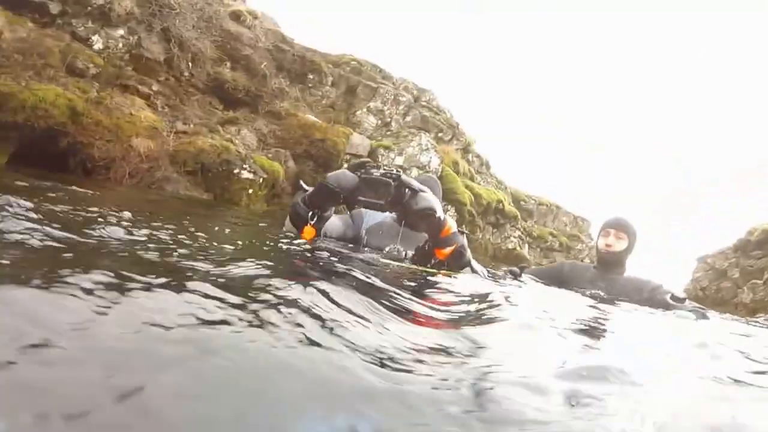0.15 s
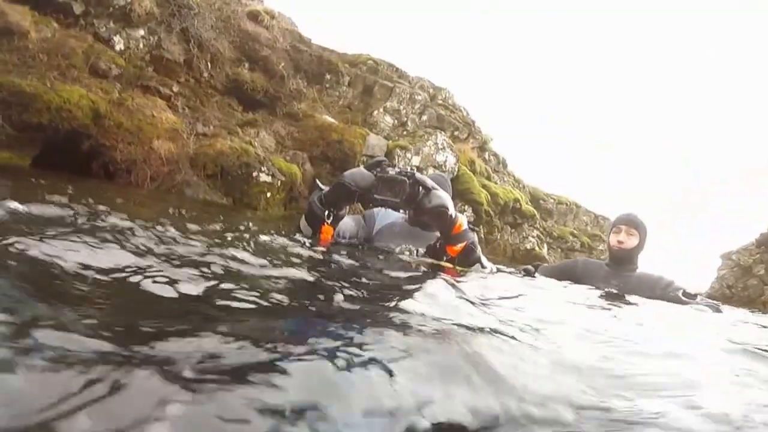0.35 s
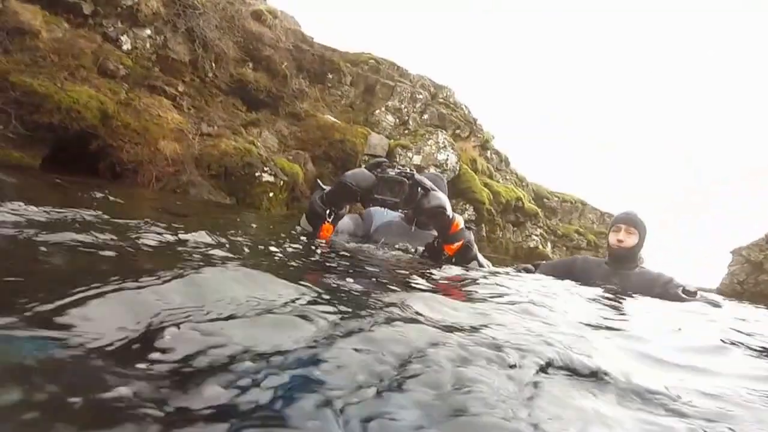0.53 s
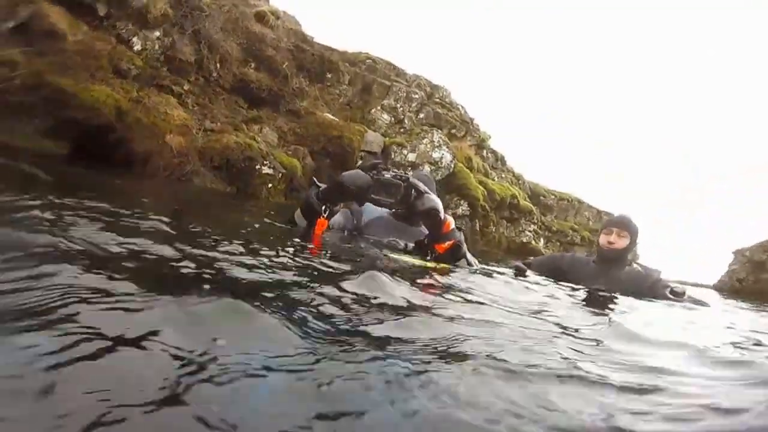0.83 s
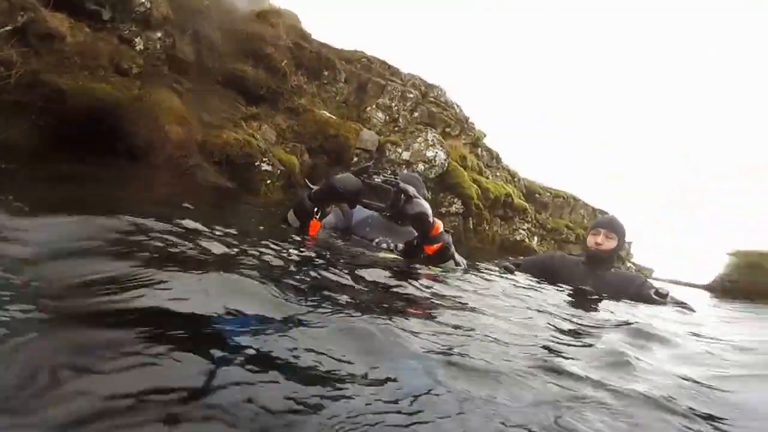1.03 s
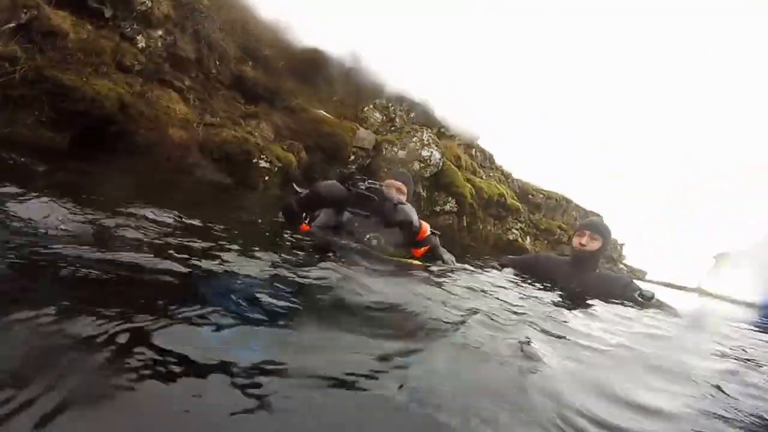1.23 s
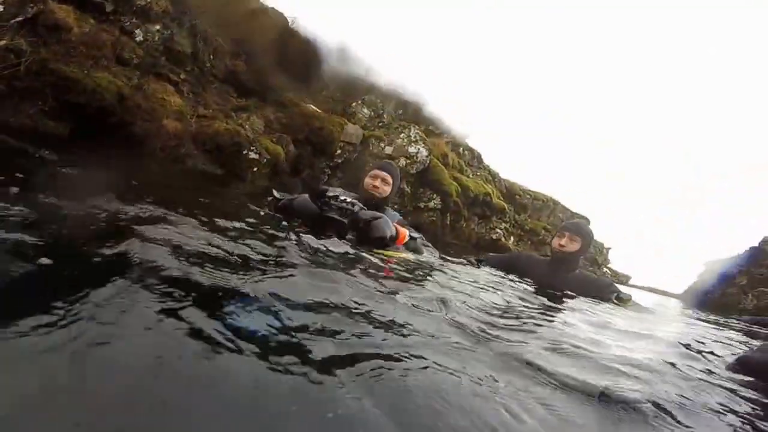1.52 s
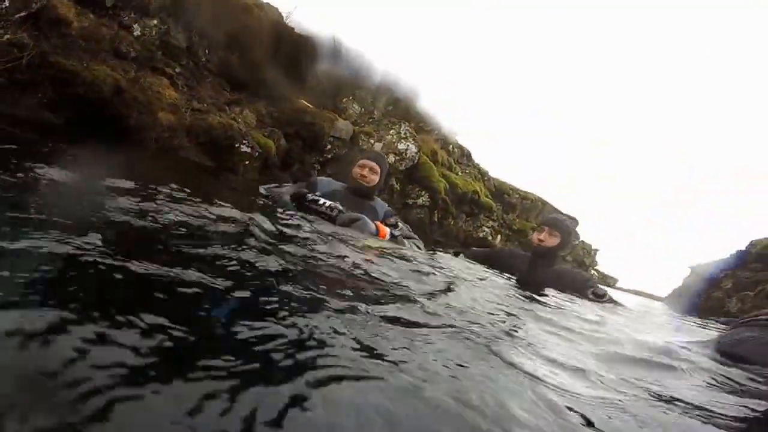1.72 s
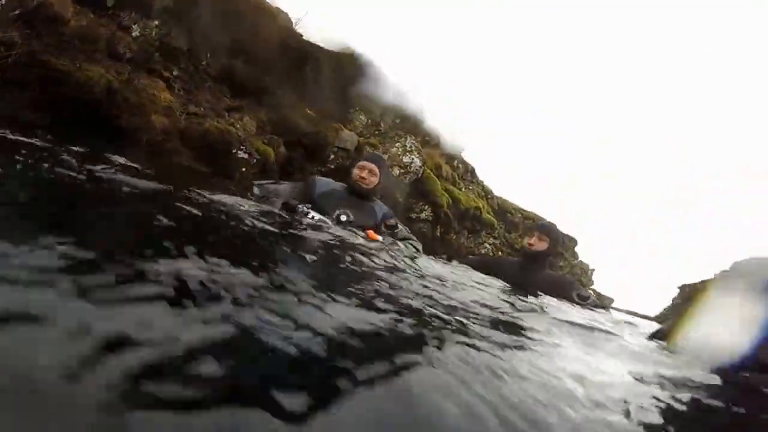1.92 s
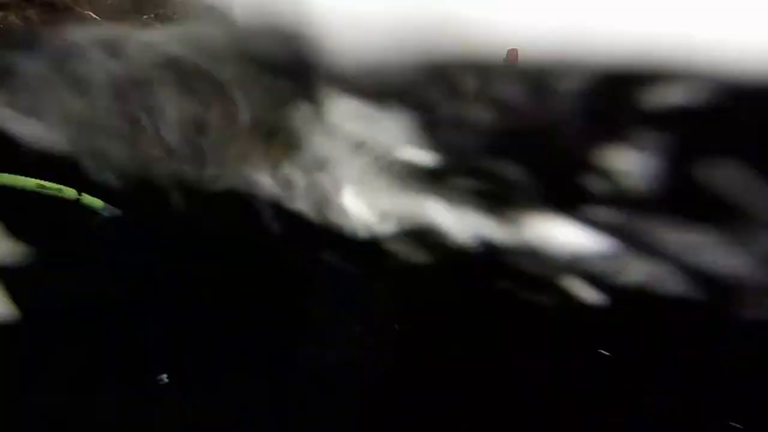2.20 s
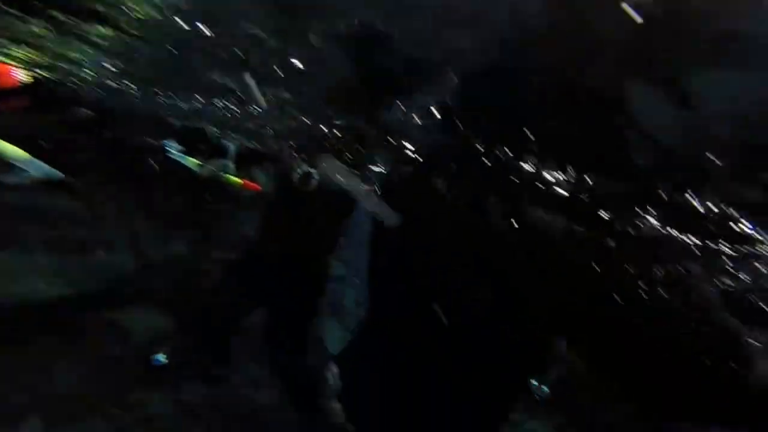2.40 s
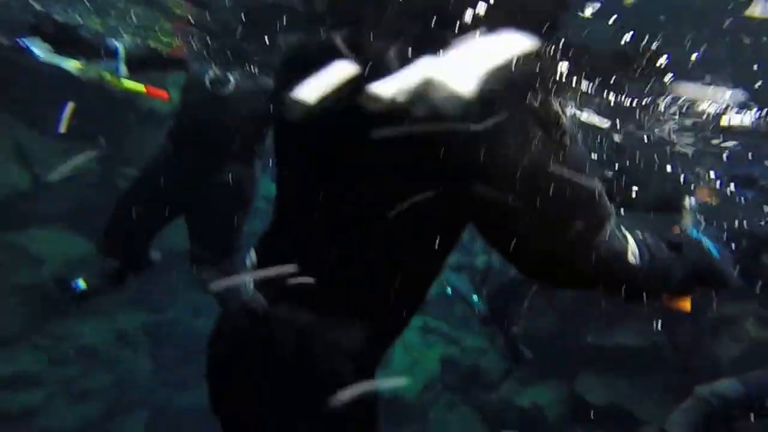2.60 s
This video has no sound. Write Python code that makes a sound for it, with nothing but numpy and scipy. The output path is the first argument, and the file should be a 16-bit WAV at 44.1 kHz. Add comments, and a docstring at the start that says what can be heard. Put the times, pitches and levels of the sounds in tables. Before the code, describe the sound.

Bubbling plunge underwater: faint muffled wash and drips, then a sudden loud burst of gurgling bubbles

```python
"""Air pockets break off and ring as bubbles while a waterproof case sinks by a rocky shore.
Each bubble is a decaying sine with a sliding, wavering pitch; random swarms of them fill in around it.
Water knocks ring the case modes; snaps and splashes are filtered noise bursts.
Before the plunge, wash and splashes come coloured by the case, drops plip beside it, wavelets bump it.
Low noise is the push of moving water; the wash surges as the case goes under, then dies away."""
import sys
import numpy as np
from scipy import signal
from scipy.fft import rfft, irfft
from scipy.io import wavfile
from scipy.ndimage import uniform_filter1d

SR = 44100
rng = np.random.default_rng(int(sys.argv[2]) if len(sys.argv) > 2 else 0)


def store_pcm(level_fs):
    """Save levels as 16-bit WAV."""
    pcm = np.round(np.clip(level_fs, -1, 1) * 32767).astype(np.int16)
    wavfile.write(sys.argv[1], SR, np.atleast_2d(pcm).T)


N = 121275
TIME_S, RING_S = np.arange(N) / SR, np.arange(8192) / SR
BURST_SAMPLES = 1024

# Air pockets ringing. Each row: start in seconds, initial pitch in Hz, peak in dB, rise in seconds,
# decay time in seconds, pitch glide as a share.
BUBBLE_EVENTS = [(2.1257, 3440, -20.5, 0.00046, 0.0042, 0.029), (2.1508, 4170, -8, 0.00025, 0.0016, 0.016),
                 (2.1667, 2555, -1.5, 0.0015, 0.0042, -0.18), (2.1860, 1390, -11.5, 0.00094, 0.0021, 0.087),
                 (2.1895, 2220, -19, 0.0017, 0.0028, 0.044), (2.2055, 2470, -14.5, 0.00078, 0.0045, 0.13),
                 (2.2105, 3830, -14, 0.00058, 0.0036, -0.026),
                 (2.2160, 3090, -1.5, 0.00073, 0.00064, -0.23), (2.2058, 1774, -19.5, 0.00064, 0.017, 0.1),
                 (2.2178, 2050, -13, 0.00076, 0.0085, 0.069), (2.2331, 2900, -6, 0.00057, 0.00091, .15),
                 (2.2457, 2370, -13, 0.0012, 0.0029, -0.0068), (2.2465, 1715, -20, 0.0011, 0.0049, 0.14),
                 (2.2678, 1342, -5.5, 0.0054, 0.0016, 0.045), (2.2700, 1955, -15.5, 0.0026, 0.0046, 0.01),
                 (2.2735, 1538, -14.5, .001, .005, 0), (2.2862, 868, -28, 0.0012, 0.027, -.03),
                 (2.2855, 566, -39, .001, 0.026, 0), (2.3070, 1260, -35, 0.0015, 0.012, 0.02),
                 (2.3395, 3010, -15, 0.00059, 0.00085, -0.07), (2.3605, 2880, -28, 0.001, 0.0065, 0.008),
                 (2.3610, 1430, -35, 0.0017, 0.0054, 0.023), (2.3730, 845, -23.5, 0.0019, 0.0077, -0.017),
                 (2.376, 890, -34, .003, 0.02, 0.065), (2.3835, 1940, -20.5, 0.0001, 0.0056, -0.019),
                 (2.3960, 1235, -33.5, 0.0021, 0.012, 0.055), (2.4503, 2260, -6, .0003, 0.0007, -0.14),
                 (2.452, 1440, -19, 0.0028, 0.0068, -0.039), (2.4630, 1325, -15.5, 0.0012, 0.0045, 0.00088),
                 (2.4690, 650, -29, 0.0017, 0.0076, -0.018), (2.5258, 2314, -23, 0.0016, 0.0042, 0.032),
                 (2.5262, 1493, -30.5, 0.0015, 0.0051, .02), (2.5517, 2120, -33, 0.00041, 0.0059, 0.017),
                 (2.5515, 1840, -23, 0.00081, 0.0074, -0.045), (2.5520, 646, -35.5, .001, 0.014, 0.022),
                 (2.6140, 2030, -39, 0.0021, 0.002, 0.035), (2.6390, 1970, -26.5, 0.00046, 0.0031, -0.011),
                 (2.7290, 1880, -45, 0.0028, 0.0044, -0.014)]
WOBBLE_HZ, WOBBLE_SHARE, WOBBLE_DB, WOBBLE_ONSET_S = 31.5, 0.019, 1, 0.015

# Swarm of small bubbles. Each row: time in seconds, gain in dB on a swarm of overall rms 1.
GURGLE_GAIN = [(2.1, -68), (2.13, -47), (2.23, -37.5), (2.3, -44), (2.34, -57), (2.39, -46), (2.44, -56.5),
               (2.53, -72), (2.7, -82.5)]
# Larger bubbles ringing on. Each row: time in seconds, gain in dB on a swarm of overall rms 1.
GULP_GAIN = [(2.27, -73), (2.29, -49), (2.38, -43), (2.44, -67), (2.48, -53), (2.65, -69)]
# Crackle of foam. Each row: time in seconds, gain in dB on a swarm of overall rms 1.
SPRAY_GAIN = [(2.1, -64.5), (2.135, -35), (2.17, -59.5), (2.245, -36.5), (2.31, -72), (2.5, -82.5)]
# Droplets. Each row: time in seconds, gain in dB on a swarm of overall rms 1.
PATTER_GAIN = [(0, -78), (.1, -44), (.33, -54.5), (.5, -71), (.88, -51.5), (1.05, -72), (1.6, -73),
               (2.1, -53.5), (2.3, -78)]

# Water knocking on the case. Each row: start in seconds, peak in dB, favoured pitch in Hz.
KNOCK_EVENTS = [(1.9752, -27, 1650), (2.1255, -17, 4070), (2.1345, -16, 3180), (2.1510, -8.5, 4230),
                (2.1850, -17, 3300), (2.1878, -10.5, 1690), (2.2162, -6, 2690), (2.2380, -11, 4600),
                (2.2462, -6.5, 2030), (2.2678, -3.5, 1550), (2.3396, -14.5, 2500), (2.3607, -19, 1630),
                (2.4504, -5, 3807), (2.4635, -12.5, 2100), (2.4675, -20.5, 2300), (2.5140, -28, 1700),
                (2.5262, -25, 1900), (2.6392, -31.5, 2060)]
# Modes of the case in water. Each row: mean pitch in Hz, level in dB before the knock's weighting,
# decay time in seconds.
CASE_MODES = [(640, -13, 0.0096), (880, -3.5, 0.0056), (1350, 7.5, 0.0018), (1536, -3, 0.0069),
              (1982, 3, 0.0036), (2263, 7.5, 0.0022), (2547, -0.5, 0.0035), (3020, -11.5, 0.0065),
              (3530, -7, 0.0028), (4700, 1, .0018)]
KNOCK_OCTAVES, KNOCK_RISE_S = 0.44, 0.00026
CRACK_DB, CRACK_S, CRACK_TOP_HZ = -2, 0.0014, 7200  # level relative to the peak of the ring

# Tiny air films snapping on the case. Each row: start in seconds, peak in dB, favoured pitch in Hz.
SNAP_EVENTS = [(.642, -24.5, 7660), (1.975, -27.5, 8160), (2.1357, -27.5, 13800), (2.1425, -30, 6060),
               (2.2105, -19.5, 6700), (2.2438, -11.5, 8470), (2.282, -20.5, 6200), (2.2995, -30.5, 9800),
               (2.4578, -15, 7720), (2.4675, -25.5, 8200), (2.521, -35.5, 13500)]
SNAP_S, SNAP_OCTAVES = 0.0014, 0.21

# Splashes against the case. Each row: start in seconds, peak in dB, favoured pitch in Hz.
SPLASH_EVENTS = [(.0975, -26, 2770), (.119, -40, 3320), (.209, -36, 2780), (.250, -40, 4250),
                 (.322, -35.5, 3250), (.4105, -33.5, 3570), (.4955, -33.5, 1960), (.6418, -22.5, 3060),
                 (2.0715, -31, 1780)]
SPLASH_OCTAVES, SPLASH_RISE_S, SPLASH_S = 0.81, 0.00012, 0.0025

# Drops that plip beside the case. Each row: start in seconds, pitch in Hz, peak in dB.
DROP_EVENTS = [(.064, 2070, -44), (0.101, 2550, -34.5), (0.098, 1370, -26.5), (0.136, 2220, -33),
               (0.208, 2890, -36), (.291, 2040, -40), (.403, 2080, -34), (0.413, 3380, -37),
               (0.62, 2490, -36), (0.6414, 3710, -21), (.642, 4790, -22.5), (.6424, 1616, -24.5),
               (.701, 2190, -37), (0.755, 4100, -39), (1.781, 2080, -30)]
DROP_RISE_S, DROP_S = 0.00026, 0.0021

# Wavelets bumping the case. Each row: start in seconds, initial pitch in Hz, peak in dB.
BUMP_EVENTS = [(.1, 190, -33.5), (.265, 210, -40), (.417, 180, -34), (.641, 140, -42.5),
               (1.976, 205, -28.5), (2.088, 150, -39.5), (2.1868, 170, -29.5), (2.244, 140, -35),
               (2.2668, 330, -29.5)]
BUMP_RISE_S, BUMP_CYCLES = 0.002, 1.0

# Passage of airborne sound through the case. Each row: frequency in Hz, gain in dB before mode lifts.
CASE_PASSAGE = [(100, -29), (200, -5), (900, -10.5), (1200, -8.5), (1600, -2), (1850, -12.5), (2050, -3.5),
                (2800, -13), (4000, -18.5), (5000, -24.5), (6000, -19.5), (13300, -38.5), (16000, -45)]
# Case resonances in air. Each row: centre in Hz, full width at half the dB lift in Hz, lift in dB.
CASE_AIR_MODES = [(1626, 210, 8), (2040, 270, 6.5), (2487, 350, 7.5), (3340, 550, 5.5), (3970, 250, 8.5),
                  (4560, 220, 8.5)]
# Waves on the rocks. Each row: time in seconds, gain in dB before trim and flutter.
WASH_GAIN = [(0, -50), (.2, -48), (.45, -52), (.68, -45), (1.0, -47.5), (1.13, -42.5), (1.27, -44.5),
             (1.5, -54.5), (1.7, -54), (1.85, -46.5), (2.03, -52), (2.2, -38), (2.42, -54.5), (2.75, -65.5)]
WASH_TRIM_DB = -4

# Pressure of moving water. Each row: time in seconds, gain in dB before SWAY_DB is added.
SWAY_GAIN = [(0, -55.5), (.1, -50), (.7, -53.5), (.85, -56.5), (1.75, -54.5), (1.99, -51), (2.06, -49),
             (2.3, -49), (2.75, -62)]
# Spectrum of that pressure. Each row: frequency in Hz, relative level in dB.
SWAY_SPECTRUM = [(10, 0), (25, -3), (50, -6), (100, -13.5), (200, -18), (350, -23.5), (800, -29.5),
                 (2000, -59)]
SWAY_DB = 3.5

FADE_HZ, EDGE_HZ = 14200, 16400


def amp(db):
    """Decibels to gain."""
    return 10 ** (np.asarray(db) / 20)


def unit(x):
    """Scales to rms 1."""
    return x / np.sqrt(np.mean(x ** 2) + 1e-20)


def peaked(x, db):
    """Scales to a peak level in dB."""
    return amp(db) * x / (abs(x).max() + 1e-20)


def read(points, hz):
    """Reads a spectrum in dB on a log-frequency axis."""
    f, db = np.transpose(points)
    return np.interp(np.log(hz + 1), np.log(f), db)


def level(points):
    """Gain over time from (s, dB) points."""
    return amp(np.interp(TIME_S, *np.transpose(points)))


def add(mix, start_s, sound):
    """Mixes a sound in at a time."""
    part = mix[round(start_s * SR):][:len(sound)]
    part += sound[:len(part)]


def colour(x, db_at):
    """Causal minimum-phase filter with the gain db_at(Hz)."""
    hz = abs(np.fft.fftfreq(4096, 1 / SR))
    log_gain = np.log(amp(db_at(hz)) + 1e-5)
    taps = np.fft.ifft(np.exp(np.conj(signal.hilbert(log_gain)))).real
    return signal.fftconvolve(x, taps[:len(taps) // 2])[:len(x)]


def swell(rise_s, decay_s):
    """Soft start and exponential decay."""
    return (1 - np.exp(-(RING_S / rise_s) ** 2)) * np.exp(-RING_S / decay_s)


def focus(hz, centre_hz, octaves):
    """Level in dB that falls away on both sides of a pitch."""
    offset = np.log2((hz + 1) / centre_hz) / octaves
    return -20 * np.log10(1 + offset ** 2)


def burst(rise_s, decay_s):
    """A few milliseconds of turbulence: noise under a swell."""
    return rng.standard_normal(BURST_SAMPLES) * swell(rise_s, decay_s)[:BURST_SAMPLES]


def bubble(hz, db, rise_s, decay_s, glide, settle_s=0.0048):
    """A pocket of air rings; its pitch slides as it moves, and it wavers as its shape wobbles."""
    onset = 1 - np.exp(-RING_S / WOBBLE_ONSET_S)
    wobble = onset * np.sin(2 * np.pi * (WOBBLE_HZ * RING_S + rng.random()))
    slide = glide * (1 - np.exp(-RING_S / settle_s))
    pitch_hz = hz * (1 + slide + WOBBLE_SHARE * wobble)
    tone = np.sin(2 * np.pi * np.cumsum(pitch_hz) / SR)
    return peaked(tone * swell(rise_s, decay_s) * amp(WOBBLE_DB * wobble), db)


def swarm(curve, per_s, spread_db, low_hz, high_hz, cycles, tilt_db, glide, count=18):
    """Many bubbles at random moments, each decaying over some cycles; tilt_db is per octave."""
    out = np.zeros(N)
    for hz in np.geomspace(low_hz, high_hz, count):
        struck = rng.random(N) < per_s / count / SR
        hits = struck * amp(spread_db * np.minimum(rng.exponential(1, N), 2.5))
        ring = bubble(hz, tilt_db * np.log2(hz / low_hz), 1 / hz, cycles / hz, glide)
        out += signal.oaconvolve(hits, ring)[:N]
    return unit(out) * level(curve)


def knock(db, centre_hz):
    """A short crack of water rings the modes of the case."""
    ring = np.zeros(len(RING_S))
    for hz, mode_db, decay_s in CASE_MODES:
        mode_hz = hz * (1 + 0.022 * rng.standard_normal())
        tone = np.sin(2 * np.pi * (mode_hz * RING_S + rng.random()))
        gain = amp(mode_db + focus(hz, centre_hz, KNOCK_OCTAVES))
        ring += gain * swell(KNOCK_RISE_S, decay_s) * tone

    def crack_db(hz):
        return focus(hz, centre_hz, octaves=0.53) - 10 * np.log10(1 + (hz / CRACK_TOP_HZ) ** 8)

    noise = rng.standard_normal(len(RING_S)) * swell(KNOCK_RISE_S, CRACK_S)
    crack = peaked(colour(noise, crack_db), CRACK_DB)
    return peaked(ring / abs(ring).max() + crack, db)


def snap(db, centre_hz, skirt_db=-17):
    """An air film snaps: a bright burst about a millisecond long, strongest around one pitch."""
    def shape_db(hz):
        skirt = skirt_db + focus(hz, centre_hz / 2, 1.0)
        return np.maximum(focus(hz, centre_hz, SNAP_OCTAVES), skirt)

    return peaked(colour(burst(KNOCK_RISE_S, SNAP_S), shape_db), db)


def case_in_air(hz):
    """Colour in dB that the closed case gives to sounds in the air."""
    lift = sum(db / (1 + (2 * (hz - f) / width) ** 4) for f, width, db in CASE_AIR_MODES)
    return read(CASE_PASSAGE, hz) + lift


def splash(db, centre_hz, bright_db=3):
    """A spatter of water on the case wall: a noise burst coloured by the case."""
    def shape_db(hz):
        bright = bright_db * np.log2(1 + hz / 1000)
        return case_in_air(hz) + focus(hz, centre_hz, SPLASH_OCTAVES) + bright

    return peaked(colour(burst(SPLASH_RISE_S, SPLASH_S), shape_db), db)


def drop(hz, db):
    """A drop plips beside the case: a brief bubble tone without glide."""
    return bubble(hz, db, DROP_RISE_S, DROP_S, 0)


def bump(hz, db):
    """A wavelet bumps the case: a low tone that decays within about a cycle."""
    return bubble(hz, db, BUMP_RISE_S, BUMP_CYCLES / hz, -0.0051)


def wash(flutter_db=2.0):
    """Waves on the rocks: case-coloured noise, fluttering; it surges at the plunge, then dies away."""
    flutter = unit(uniform_filter1d(rng.standard_normal(N), size=700))
    noise = unit(colour(rng.standard_normal(N), case_in_air))
    return noise * amp(WASH_TRIM_DB + flutter_db * flutter) * level(WASH_GAIN)


def sway():
    """Low rumble of water pushing on the case: noise shaped by its spectrum."""
    gain = amp(read(SWAY_SPECTRUM, np.fft.rfftfreq(N, 1 / SR)))
    rumble = irfft(rfft(rng.standard_normal(N)) * gain, N)
    return unit(rumble) * level(SWAY_GAIN) * amp(SWAY_DB)


def scene():
    """The surface, then the plunge."""
    mix = wash() + sway()
    mix += swarm(PATTER_GAIN, per_s=300, spread_db=9, low_hz=1330, high_hz=7700,
                 cycles=4, tilt_db=-4.0, glide=0.036)
    mix += swarm(GURGLE_GAIN, per_s=600, spread_db=3.0, low_hz=1391, high_hz=4850,
                 cycles=11, tilt_db=-6.0, glide=0.031)
    mix += swarm(GULP_GAIN, per_s=230, spread_db=0.0, low_hz=666, high_hz=1353,
                 cycles=17, tilt_db=-8.5, glide=0.033)
    mix += swarm(SPRAY_GAIN, per_s=1500, spread_db=6.0, low_hz=3420, high_hz=13200,
                 cycles=2.6, tilt_db=-8.5, glide=0, count=10)
    sources = [(BUBBLE_EVENTS, bubble), (KNOCK_EVENTS, knock), (SNAP_EVENTS, snap),
               (SPLASH_EVENTS, splash), (DROP_EVENTS, drop), (BUMP_EVENTS, bump)]
    for events, source in sources:
        for start_s, *settings in events:
            add(mix, start_s, source(*settings))
    return mix[None]


def record(dry):
    """Loud peaks are rounded off, the top treble fades; then the band limit."""
    rounded = dry / (1 + dry ** 8) ** (1 / 8)
    dulled = signal.lfilter(*signal.butter(6, FADE_HZ, fs=SR), rounded)
    band_limit = signal.firwin(255, EDGE_HZ, window=("kaiser", 9), fs=SR)
    return signal.oaconvolve(dulled, band_limit[None], "same")


dry = scene()
out = record(dry)
store_pcm(out)
```